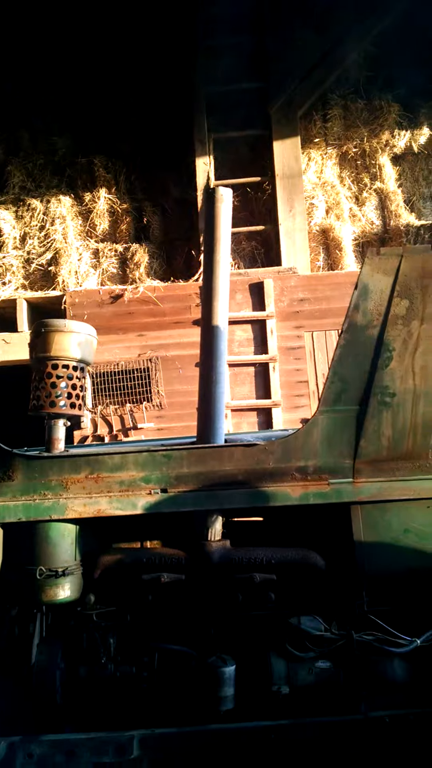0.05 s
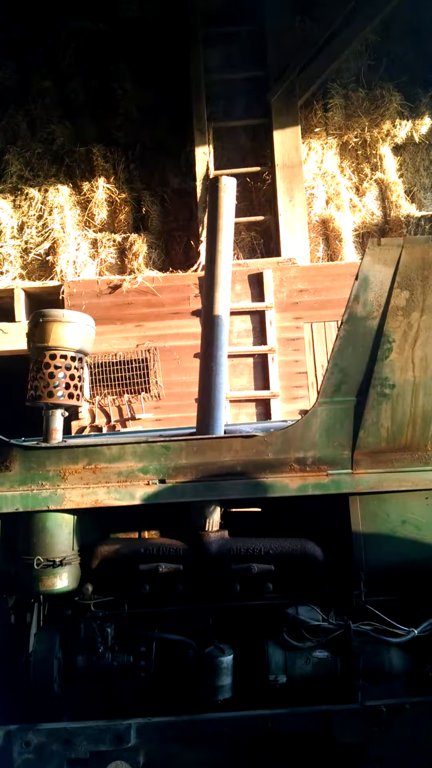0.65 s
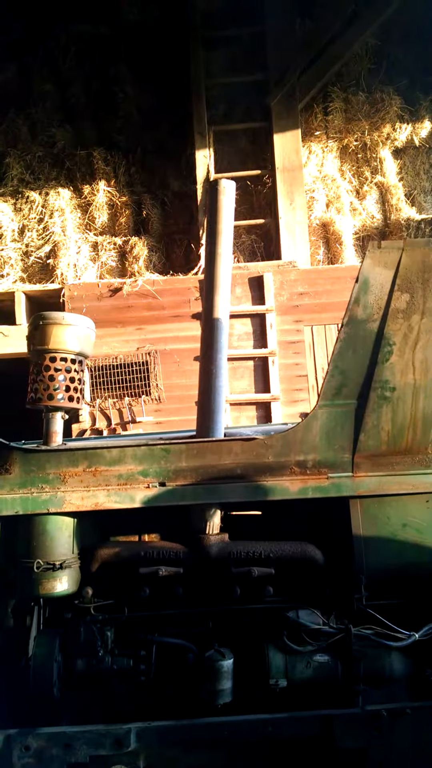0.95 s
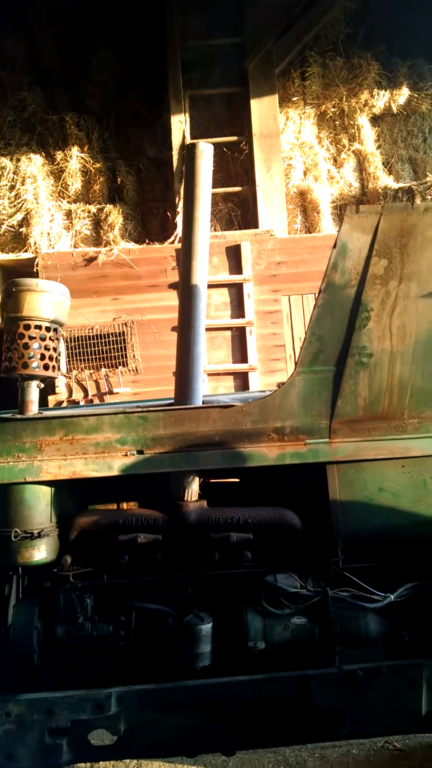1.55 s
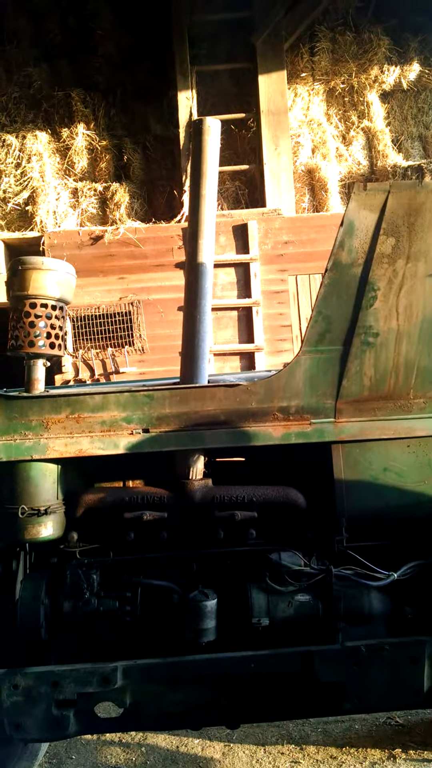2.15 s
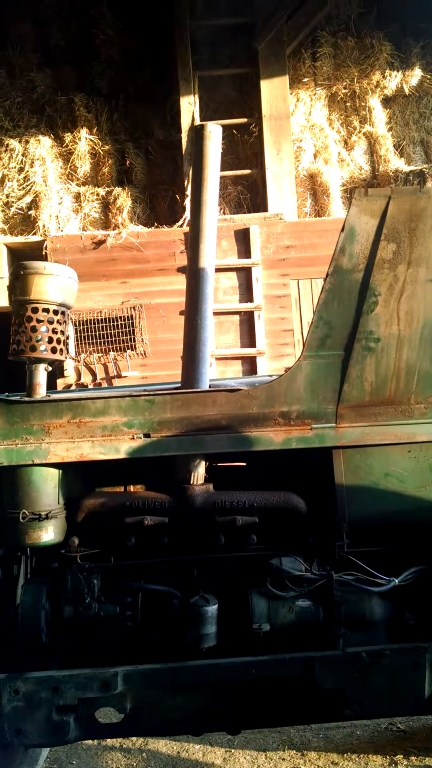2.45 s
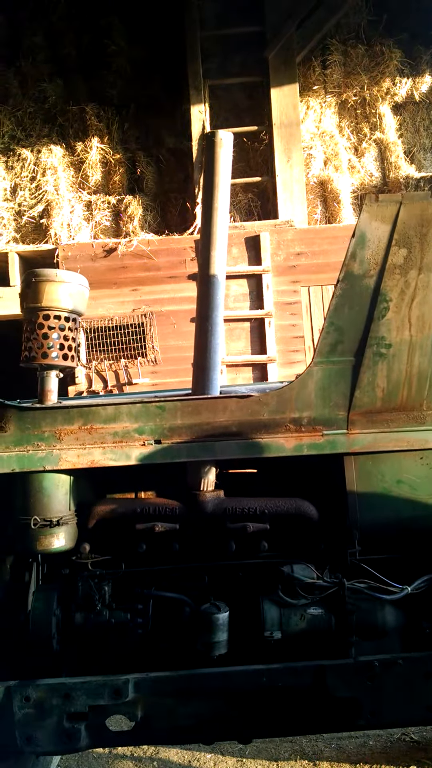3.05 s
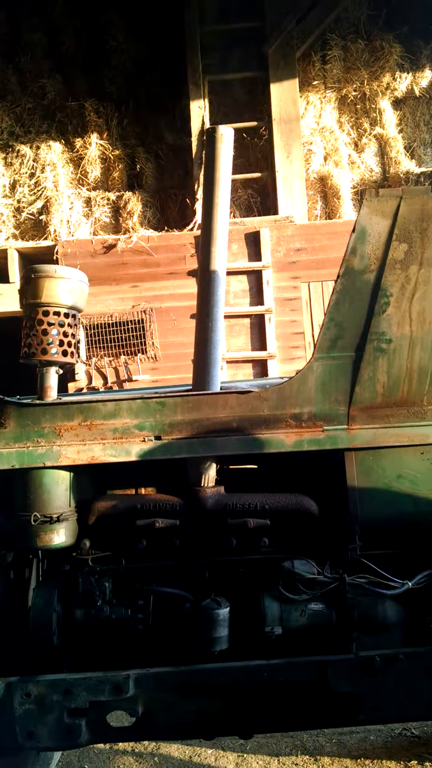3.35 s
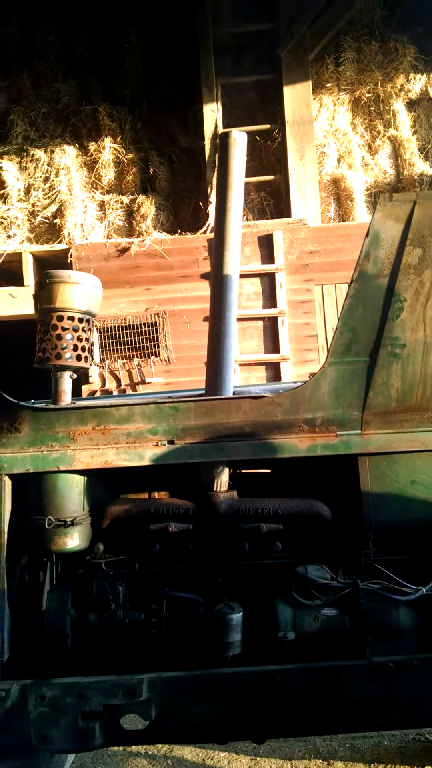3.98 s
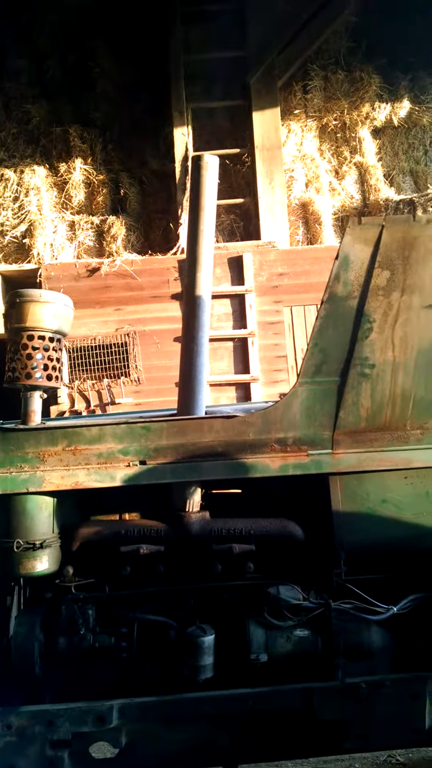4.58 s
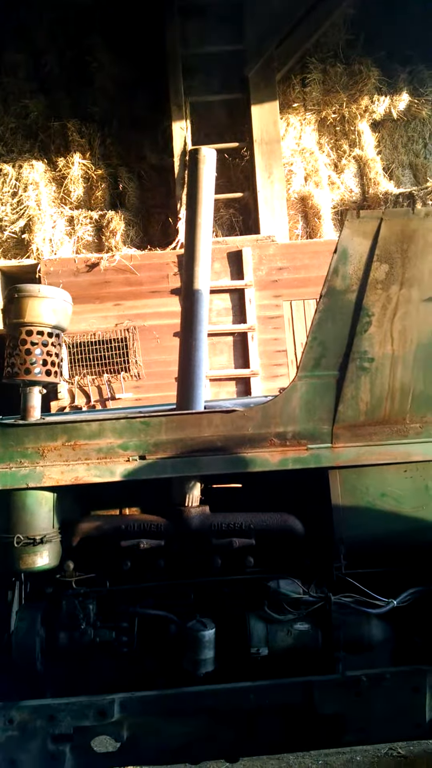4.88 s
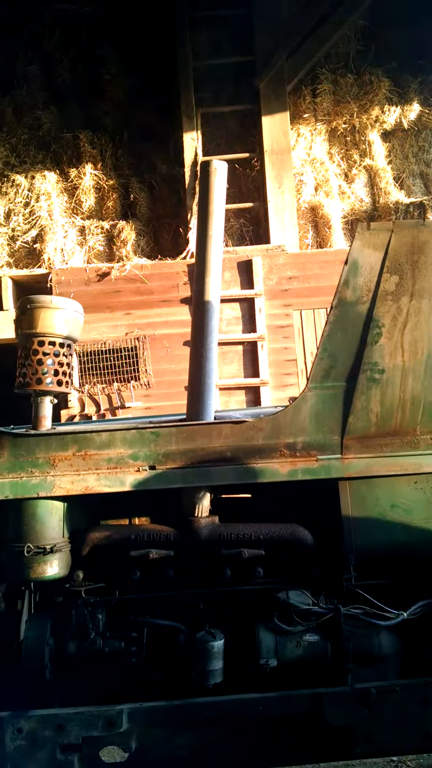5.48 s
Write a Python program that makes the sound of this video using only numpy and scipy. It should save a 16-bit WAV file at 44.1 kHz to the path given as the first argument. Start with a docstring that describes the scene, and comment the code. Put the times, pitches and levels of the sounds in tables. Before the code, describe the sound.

A loud diesel tractor engine runs steadily in a barn, chugging through an open exhaust stack with knocking and ticking.

```python
"""A loud, barking diesel chug: a cold four-cylinder tractor runs in a barn at about 1800 rpm.
It lopes every few cycles and sags now and then. The straight stack booms once per firing and rings
with each gas puff; combustion blows bark and shake the panels, which chug and sing. The block knocks,
the pump clicks and the valve gear ticks in step with the crank. The barn adds a short tail.
The channels are in opposite polarity; the engine reaches the left a little later and weaker."""
import sys
import numpy as np
from scipy import signal
from scipy.fft import rfft, irfft, next_fast_len
from scipy.io import wavfile
from scipy.ndimage import map_coordinates

SR = 44100
rng = np.random.default_rng(int(sys.argv[2]) if len(sys.argv) > 2 else 0)


def store_wav(level_fs):
    """Save 16-bit WAV to argv[1]."""
    pcm = np.round(np.clip(np.atleast_2d(level_fs), -1, 1) * 32767)
    wavfile.write(sys.argv[1], SR, pcm.T.astype(np.int16))


N = 247842

# governed speed, one stumble and a last pick-up: (time [s], firing rate [Hz])
FIRING_RATE = [(0.0, 62.25), (0.35, 60.39), (0.6, 61.47), (0.8, 60.43), (1.35, 60.23), (1.7, 60.65),
               (2.6, 60.57), (2.9, 60.89), (3.22, 60.84), (3.41, 57.32), (3.58, 60.56), (3.8, 59.6),
               (4.2, 60.12), (4.82, 60.04), (5.02, 60.6), (5.22, 61.02), (5.62, 63.9)]
# engine effort, taken about its mean: (time [s], combustion [dB], clatter [dB])
ENGINE_EFFORT = [(0, -0.5, 2), (.04, 0.5, 0), (.1, -3.5, -3), (.24, 0.5, .5), (.34, -1.5, 0),
                 (.47, -1.1, 0), (.58, 0, 1), (.68, -2, -4.5), (.88, -2.5, -1.5), (1.02, 0.5, 0.1),
                 (1.12, 0.5, -0.5), (1.17, -3, -3.5), (1.38, -0.5, 0), (1.49, -1, -1), (1.6, 1.2, 0),
                 (1.72, -1, -0.5), (1.84, 0.2, -0.5), (2.04, -.5, -1.3), (2.14, 0.7, 1.1), (2.24, -0.3, -1),
                 (2.36, 0.7, -0.9), (2.55, -1.5, -0.9), (2.68, 0.7, 0.5), (2.95, -0.2, -1.7),
                 (3.15, 0.9, 1), (3.28, -2.5, -3), (3.39, -1.2, -0.5), (3.47, 1, 0.5), (3.6, -2, -2.5),
                 (3.76, 0.5, 0.2), (3.87, -1.1, -2.5), (4.0, 0, 0.2), (4.25, 0.4, -1), (4.74, 1.3, 0.3),
                 (4.82, -0.5, -3), (4.98, 2, 0.5), (5.08, 0.4, -2.5), (5.22, 1.5, -0.5), (5.53, -1, -4),
                 (5.62, 0, -0.5)]
# deep boom: (time [s], level [dB])
BOOM_LEVEL = [(0, -16), (.58, -17), (.7, -20), (1.03, -16.5), (1.2, -17.5), (1.4, -16), (2.3, -15.5),
              (2.7, -17), (3.26, -17), (3.39, -19), (3.47, -13.5), (3.57, -16), (5.26, -17), (5.55, -20)]
# stack overtones, fractional as the cylinders differ: (multiple of firing rate, level [dB])
DRONE_PARTIALS = [(.5, -17), (1.5, -16), (2, -16), (3.5, -15.5), (4.5, -14), (5, -17.5), (6, -28),
                  (7, -17.5), (9, -24.5), (10, -21), (14.5, -19.5)]
# two more overtones, at HUM_MULTIPLES: (time [s], lower [dB], upper [dB])
HUM_LEVELS = [(0, -10, -9), (.62, -14, -10), (.78, -16, -18), (2.25, -12, -15), (3.3, -15, -17),
              (3.48, -8.5, -19), (4.4, -8.5, -16), (4.95, -13, -15), (5.5, -7, -19)]
# rasp relative to the block knock: (time [s], level [dB])
KNOCK_RASP_LEVEL = [(0, -17), (4.1, -20), (4.5, -6), (5.62, -8.5)]

# cold lope, one row per period in LOPE_PERIODS_FIRINGS: (crest [firings], depth [dB])
BOOM_SWELLS = [(6.2, 1.2), (2.6, 0.5), (4.5, 0.5)]
PIPE_SWELLS = [(1.4, 0.14), (7.3, 0.23), (3.3, 0.72)]
BARK_SWELLS = [(1.6, 0.27), (.1, 0.14), (2.7, 0.27)]
CLATTER_SWELLS = [(9.3, 0.3), (5.7, 0.11), (2.2, 0.34)]

# events in one 720 degree cycle: (crank angle [deg], level [dB])
GAS_PUFFS = [(100, 0.5), (220, 1.5), (425, 2.5), (505, -5.5), (635, -3.5)]
COMBUSTION_BLOWS = [(103, 0.5), (166, 2.5), (228, -4), (305, -3), (360, -7), (478, -1), (528, -3),
                    (578, -3), (640, -1.5)]
PISTON_INJECTOR_KNOCKS = [(62, -1.5), (112, -4), (160, -9), (295, -7), (350, -5), (425, 0.5), (470, -2),
                          (525, -7), (655, -7), (700, -8)]
VALVE_TICKS = [(78, -3), (135, -6.5), (188, -4), (243, -1.5), (288, -2), (342, 0), (432, -3.5), (498, -6),
               (548, -3), (602, -1.5), (648, -3), (703, 0)]
INJECTION_CLICKS = [(353, 0), (712, -2)]

# single hard firings: (time [s], relative level [dB])
HARD_FIRINGS = [(0.604, -7.5), (2.395, -11), (2.517, -13), (3.374, -13), (3.733, -13), (5.195, -12)]
# heavy firings that ring the hood: (time [s], relative level [dB], pitch [Hz])
HOOD_CHUGS = [(0.21, -13, 717), (0.396, -15, 686), (0.435, -15.5, 756), (1.39, -17.5, 726),
              (2.124, -14, 737), (3.103, -23, 760), (4.165, -13, 700), (4.51, -15, 748), (4.887, -16, 670),
              (4.976, -12, 762), (5.173, -18, 700), (5.366, -17, 686), (5.408, -15, 756)]
# single sharp, bright clicks: (time [s], relative level [dB])
SHARP_CLICKS = [(.488, -24), (.7513, -25), (.8176, -18), (.9683, -23), (1.612, -22), (2.734, -24),
                (2.898, -24), (3.144, -23), (5.022, -24), (5.422, -23)]
# singing panels: (start [s], length [s], pitch [Hz], width [Hz], level [dB])
PANEL_TONES = [(0, 0.81, 245, 25, -29), (0.852, 0.89, 359, 25, -31.5), (1.298, 1.3, 614, 35, -32),
               (1.8, 1.44, 303, 35, -32.5), (3.35, 0.74, 510, 25, -30), (4.75, .8, 1057, 70, -32),
               (4.597, 1.1, 2230, 120, -31.5)]

# resonances of stack and barn: (frequency [Hz], width [Hz], level [dB])
PIPE_MODES = [(142, 6.7, 2), (163, 10.5, 3.5), (187.5, 22, -2), (214, 8.7, 1.5), (237.5, 3.4, -3),
              (306.5, 4.9, -7), (321, 18, -9.5), (360.4, 10, 2.5)]
# panel resonances: (frequency [Hz], width [Hz], level [dB])
PANEL_MODES = [(495.3, 15, 4.5), (611, 24, 0.5), (688, 28, 3), (712.5, 17.4, 2), (741.5, 39, 0),
               (821, 19, 1), (883.4, 18.4, 2.5), (968, 73, -5.5), (1072, 37, -1), (1177, 36, -18),
               (1960, 23, -2.5), (2170, 49, -4)]

# noise colour of each layer: (frequency [Hz], relative level [dB])
GAS_SPECTRUM = [(20, -12), (42, -3), (75, -4.5), (110, -3), (150, -4.5), (260, -2.5), (400, -7.5),
                (600, -12.5), (1500, -66)]
BARK_SPECTRUM = [(150, -34), (330, -1), (450, -3), (720, 1.5), (900, 0), (1100, 0.5), (1300, -2),
                 (1650, -1), (2150, -0.2), (2300, 2), (2440, -59), (3200, -33), (8000, -57)]
BLOCK_SPECTRUM = [(1500, -17), (2350, -15), (2750, -14), (2950, 1.5), (3300, -1.1), (3750, .2), (4150, .6),
                  (4500, 2.4), (4780, -1.2), (5150, -6), (5500, -3), (5900, -1.7), (7000, -9),
                  (7500, -13.5), (8100, -14.5), (8600, -12), (11000, -30)]
RASP_SPECTRUM = [(5000, -30), (5400, 1), (5800, 2), (6300, -2), (7100, -5), (7500, -20), (9000, -42)]
NARROW_BAND_SPECTRUM = [(2250, -40), (2400, 0), (2600, -2.5), (2800, -4.5), (2950, -40)]
PUMP_SPECTRUM = [(4000, -8), (8000, -39), (9600, 14), (12000, -0.5), (15000, 4), (17000, -30)]
VALVE_SPECTRUM = [(3000, -24), (7500, -40), (8700, -12), (9700, -8), (10400, -7.5), (11300, -3),
                  (12300, -1), (13000, 1.5), (14400, 3.8), (15500, 2.2)]

# barn decay: (frequency [Hz], T60 [s])
BARN_T60 = [(100, 1), (1000, 0.059), (10000, 0.08)]
# barn reflections: (frequency [Hz], gain [dB])
BARN_GAIN = [(100, -30), (500, -19), (1000, -17), (2000, -10.5), (3200, -5.5), (4500, -8), (5800, -5.5),
             (8000, -4), (11000, -7.5), (14600, -12)]
# left channel relative to right: (frequency [Hz], gain [dB])
LEFT_GAIN = [(100, -2.8), (2200, -2.8), (2500, -.2), (2800, -.2), (4200, -2.8), (5150, -.3), (6000, -2.8),
             (7400, 0), (8200, 0), (9200, -1.3), (10300, -.2), (11500, -2.2), (12000, -1.8), (12800, -.6),
             (13500, -1.8), (14500, -1.6), (15100, -.3)]

HUM_MULTIPLES = (2.5, 4)  # near 150 and 240 Hz
LOPE_PERIODS_FIRINGS = (12, 16, 6)  # three cycles, four cycles, three turns
PIPE_DB, BARK_DB, KNOCK_DB, VALVES_DB, PUMP_DB, NARROW_BAND_DB = -21.5, -20.5, -28, -20, -41, -39
PIPE_DB_PER_EFFORT_DB, KNOCK_DB_PER_EFFORT_DB = 0.96, 0.78
EXHAUST_DRIFT_DB_PER_S = -0.14


def amp(db):
    """Decibels to gain."""
    return 10 ** (np.asarray(db) / 20)


def unit(x):
    """Scale to rms 1."""
    return x / np.sqrt(np.mean(x ** 2) + 1e-20)


def along(points, hz):
    """Interpolate (frequency [Hz], value) points on a log axis."""
    knots_hz, values = np.transpose(points)
    return np.interp(np.log(hz + 1), np.log(knots_hz + 1), values)


def curves(rows):
    """One value per sample for each column after the time."""
    times_s, *columns = np.transpose(rows)
    return [np.interp(np.arange(N) / SR, times_s, column) for column in columns]


def wobble(rate_hz):
    """Smooth random curve with knots at rate_hz."""
    knots = rng.standard_normal(int(N * rate_hz / SR) + 4)
    steps = np.linspace(0, len(knots) - 1, 6 * len(knots))
    return np.interp(np.arange(N) * rate_hz / SR, steps, map_coordinates(knots, [steps]))


def filtered(x, response):
    """Apply a complex frequency response."""
    size = next_fast_len(N + SR // 2)
    return irfft(rfft(x, size) * response(np.fft.rfftfreq(size, 1 / SR)), size)[..., :N]


def coloured(x, spectrum):
    """Shape x by a spectrum; rms 1."""
    return unit(filtered(x, lambda hz: amp(along(spectrum, hz))))


def ringing(x, modes):
    """Pass x through resonances of alternating sign; rms 1."""
    def response(hz):
        return sum((-1) ** k * amp(db) * 1j * hz * width_hz / (mode_hz**2 - hz**2 + 1j * hz * width_hz)
                   for k, (mode_hz, width_hz, db) in enumerate(modes))
    return unit(filtered(x, response))


def strikes(crank_deg, pattern, scatter_db, jitter_s):
    """An impulse as the crank passes each angle of the pattern, never twice alike."""
    cycle_deg, db = np.transpose(pattern)
    angles_deg = np.arange(-1, crank_deg[-1] / 720 + 1)[:, None] * 720 + cycle_deg
    timing, strength = rng.standard_normal((2, 100, len(cycle_deg)))[:, :len(angles_deg)]
    at = np.interp(angles_deg, crank_deg, np.arange(N), left=-SR, right=2 * N) + jitter_s * SR * timing
    inside = (at >= 0) & (at < N)
    return np.bincount(at[inside].astype(int), amp(db + scatter_db * strength)[inside], N)


def bursts(hits, decay_s, steady, softness=1):
    """Noise swelling at each hit over a steady wash; lower softness sharpens the attack."""
    age = np.arange(SR // 16) / SR / decay_s
    lead = int(decay_s * SR * softness / 2)
    power = np.abs(signal.fftconvolve(hits ** 2, age ** softness * np.exp(-age))[lead:lead + N])
    return unit(np.sqrt(power / power.mean() + steady) * rng.standard_normal(N))


def lope_db(firings, swells):
    """Slow repeating swell of the cold engine, locked to the crank."""
    return sum(db * np.cos(2 * np.pi * (firings - crest) / period)
               for period, (crest, db) in zip(LOPE_PERIODS_FIRINGS, swells))


def stereo(x, side, lag_s=0.000392):
    """Place x right (1), ahead (0) or left (-1) by delay; the left channel is inverted and weaker."""
    left = filtered(x, lambda hz: amp(along(LEFT_GAIN, hz)) * np.exp(-2j * np.pi * hz * side * lag_s))
    return np.array([-left, x])


def barn_tail():
    """Diffuse decay of unit energy, longest in the bass."""
    hz, t, noise = signal.stft(rng.standard_normal(SR // 3), SR, nperseg=256)
    fade = amp(-60 * t / along(BARN_T60, hz)[:, None])
    decay = signal.istft(noise * fade / np.linalg.norm(fade, axis=1, keepdims=True), SR, nperseg=256)[1]
    return decay / np.linalg.norm(decay)


def barn(x):
    """Boards and hay answer with a short tail that keeps changing."""
    reflected = filtered(x, lambda hz: amp(along(BARN_GAIN, hz)))
    hop = SR // 10
    window = np.sin(np.pi * np.arange(2 * hop) / (2 * hop))
    padded, out = np.pad(reflected, (hop, 2 * hop)), np.zeros(N + SR)
    for start in range(0, N + hop, hop):
        echo = signal.fftconvolve(window * padded[start:start + 2 * hop], barn_tail())
        out[start:start + len(echo)] += echo
    return out[hop:hop + N]


def pump(crank_deg):
    """The injection pump clicks once per crank turn."""
    clicks = strikes(crank_deg, INJECTION_CLICKS, scatter_db=2.0, jitter_s=0.00041)
    return coloured(bursts(clicks, decay_s=0.0017, steady=0.01, softness=0.22), PUMP_SPECTRUM)


def narrow_band(crank_deg):
    """Narrow band of noise near 2.6 kHz, pulsing with the knocks."""
    hits = strikes(crank_deg, PISTON_INJECTOR_KNOCKS, scatter_db=4.0, jitter_s=0.00042)
    return coloured(bursts(hits, decay_s=0.003, steady=2.0), NARROW_BAND_SPECTRUM)


def sharp_clicks(t60_s=0.063):
    """Single sharp, bright clicks stand out now and then."""
    out, t = np.zeros(N + SR), np.arange(SR // 12) / SR
    for start_s, db in SHARP_CLICKS:
        out[round(start_s * SR):][:len(t)] += amp(db - 60 * t / t60_s) * rng.standard_normal(len(t))
    colour_hz_db = [(800, -16), (4000, -2), (7500, -6), (10000, 1), (15000, 3)]
    return filtered(out[:N], lambda hz: amp(along(colour_hz_db, hz)))


def singing_panels():
    """One panel after another catches the vibration, swells into a rough tone and fades."""
    out = np.zeros(N + 2 * SR)
    for start_s, length_s, hz, width_hz, db in PANEL_TONES:
        swell = np.sqrt(np.hanning(int(length_s * SR)))
        ring = signal.lfilter(*signal.iirpeak(hz, hz / width_hz, SR), rng.standard_normal(2 * SR))
        out[round(start_s * SR):][:len(swell)] += amp(db) * swell * unit(ring)[:len(swell)]
    return out[:N]


def hood_chugs(gain_db=-1.5, rise_s=0.0038):
    """A heavy firing rings the hood for a few hundredths of a second."""
    out, t = np.zeros(N + SR), np.arange(SR // 16) / SR
    swell = t / rise_s * np.exp(1 - t / rise_s)
    for start_s, db, hz in HOOD_CHUGS:
        tone = np.sin(2 * np.pi * (hz * t + rng.random()))
        out[round(start_s * SR):][:len(t)] += amp(db + gain_db) * swell * tone
    return out[:N]


def hard_knocks(gain_db=-4.5, t60_s=0.024):
    """A cold cylinder fires late and hard: one short bang through the panels."""
    envelope, t = np.zeros(N + SR), np.arange(SR // 8) / SR
    for start_s, db in HARD_FIRINGS:
        envelope[round(start_s * SR):][:len(t)] += amp(db + gain_db - 60 * t / t60_s)
    roar, shake = rng.standard_normal((2, N))
    return envelope[:N] * unit(coloured(roar, BARK_SPECTRUM) + ringing(shake, PANEL_MODES))


def block_knock(crank_deg):
    """Diesel knock in the cast block; a higher rasp grows near the end."""
    hits = strikes(crank_deg, PISTON_INJECTOR_KNOCKS, scatter_db=2.0, jitter_s=0.00029)
    flares = bursts(hits, decay_s=0.0024, steady=3.0) * amp(0.38 * wobble(1000))
    rasp = coloured(bursts(hits, decay_s=0.0013, steady=3.4), RASP_SPECTRUM)
    rasp_db, = curves(KNOCK_RASP_LEVEL)
    return coloured(flares, BLOCK_SPECTRUM) + amp(rasp_db) * rasp


def valve_gear(crank_deg):
    """Bright, grainy ticking of the valve gear."""
    hits = strikes(crank_deg, VALVE_TICKS, scatter_db=0.0, jitter_s=0.00042)
    ticking = bursts(hits, decay_s=0.002, steady=1.0, softness=0.15)
    grain = amp(1.5 * wobble(1500) + 0.48 * wobble(40))
    return coloured(ticking * grain, VALVE_SPECTRUM)


def stack_drone(firings):
    """Overtones of the firing rate waver in level and phase; two come and go."""
    out = np.zeros(N)
    for multiple, db in DRONE_PARTIALS + list(zip(HUM_MULTIPLES, curves(HUM_LEVELS))):
        strength = np.sqrt(2) * amp(db + 2.2 * wobble(6))
        out += strength * np.cos(2 * np.pi * (multiple * firings + rng.random()) + 0.24 * wobble(5.03))
    return out


def stack_puffs(crank_deg):
    """Each puff rings the pipe and leaves as a rush of gas."""
    puffs = strikes(crank_deg, GAS_PUFFS, scatter_db=1.5, jitter_s=0.0013)
    rush = bursts(puffs, decay_s=0.0023, steady=0.89)
    ring = amp(-3.0) * ringing(puffs, PIPE_MODES) + amp(-7.5) * ringing(rush, PIPE_MODES)
    return unit(ring + coloured(rush, GAS_SPECTRUM))


def stack_boom(firings):
    """Deep pressure wave at the firing rate, uneven in strength."""
    unevenness = amp(0.8 * wobble(16))
    return unit(unevenness * np.cos(2 * np.pi * firings + 0.11 * wobble(28)))


def bark(crank_deg):
    """Combustion blows shake the panels and crackle from the open pipe over a dense roar."""
    blows = strikes(crank_deg, COMBUSTION_BLOWS, scatter_db=1.0, jitter_s=0.00061)
    roar = coloured(bursts(blows, decay_s=0.0016, steady=1.3), BARK_SPECTRUM)
    shake = ringing(bursts(blows, decay_s=0.002, steady=1.0), PANEL_MODES)
    clusters = amp(0.5 * wobble(45))
    return unit(clusters * (roar + amp(-9.5) * ringing(blows, PANEL_MODES) + amp(-5.0) * shake))


def scene():
    """Crank and effort drive exhaust and clatter; engine right, narrow band ahead, barn tail left."""
    firing_hz, = curves(FIRING_RATE)
    firings = np.cumsum(firing_hz) / SR
    crank_deg = 180 * firings

    combustion_db, shaking_db = (db - db.mean() for db in curves(ENGINE_EFFORT))
    drift_db = EXHAUST_DRIFT_DB_PER_S * (np.arange(N) - N / 2) / SR
    boom_db = curves(BOOM_LEVEL)[0] + lope_db(firings, BOOM_SWELLS)
    pipe_db = PIPE_DB + PIPE_DB_PER_EFFORT_DB * combustion_db + drift_db + lope_db(firings, PIPE_SWELLS)
    bark_db = BARK_DB + combustion_db + drift_db + lope_db(firings, BARK_SWELLS)
    flutter_db = lope_db(firings, CLATTER_SWELLS) + 0.84 * wobble(70) + 0.96 * wobble(400)
    clatter_db = shaking_db + flutter_db
    knock_db = KNOCK_DB + KNOCK_DB_PER_EFFORT_DB * shaking_db + flutter_db

    exhaust = amp(boom_db) * stack_boom(firings)
    exhaust += amp(pipe_db) * (stack_drone(firings) + amp(-0.3) * stack_puffs(crank_deg))
    clatter = amp(knock_db) * block_knock(crank_deg)
    clatter += amp(VALVES_DB + clatter_db) * valve_gear(crank_deg)
    clatter += amp(PUMP_DB + clatter_db) * pump(crank_deg)
    engine = exhaust + clatter + amp(bark_db) * bark(crank_deg)
    engine += singing_panels() + hood_chugs() + hard_knocks() + sharp_clicks()
    band = amp(NARROW_BAND_DB + clatter_db) * narrow_band(crank_deg)
    return stereo(engine, side=1) + stereo(band, side=0) + stereo(barn(engine), side=-1)


def record(dry):
    """Round the highest peaks, then cut the top treble."""
    ceiling, cutoff_hz = 0.95, 15520
    rounded = dry / (1 + np.abs(dry / ceiling) ** 8) ** (1 / 8)
    return filtered(rounded, lambda hz: hz < cutoff_hz)


dry = scene()
out = record(dry)
store_wav(out)
```